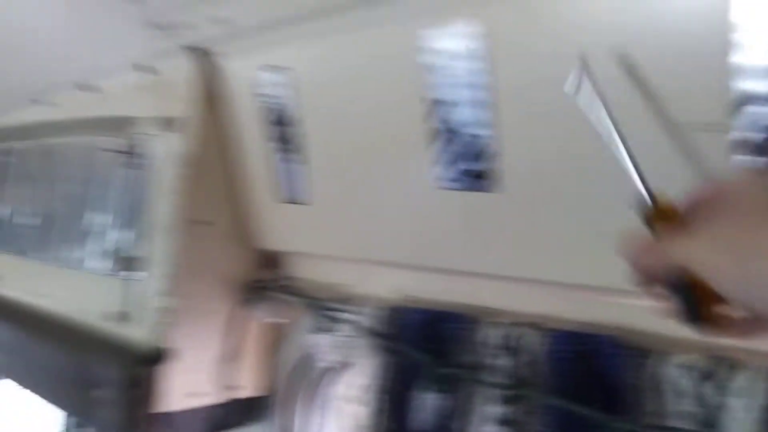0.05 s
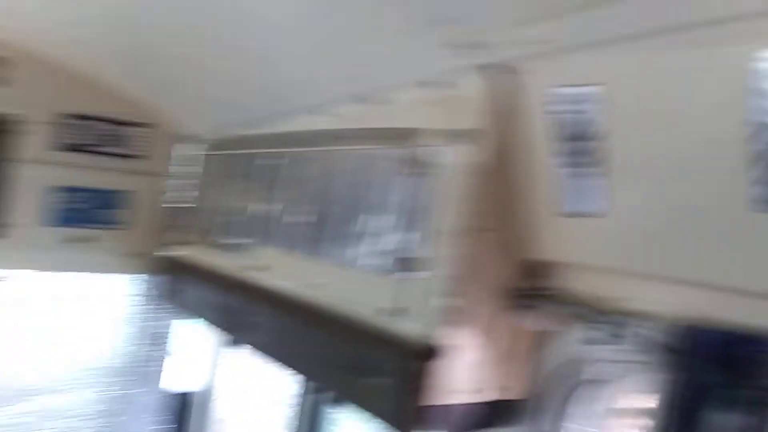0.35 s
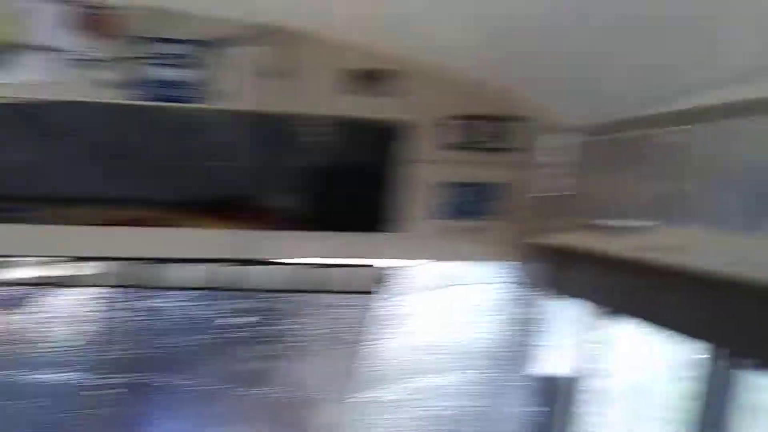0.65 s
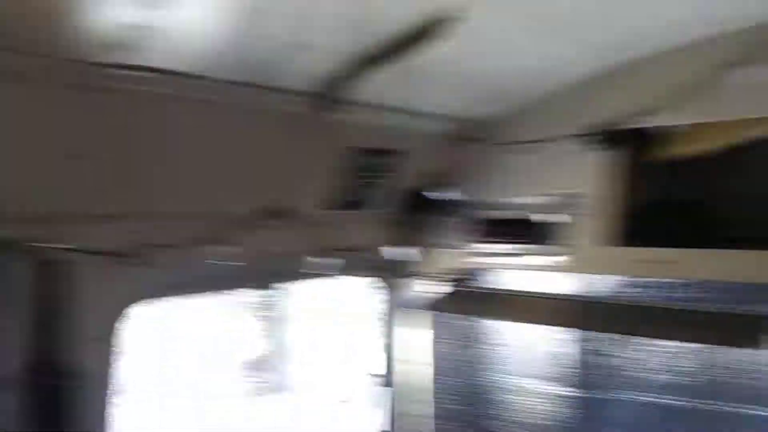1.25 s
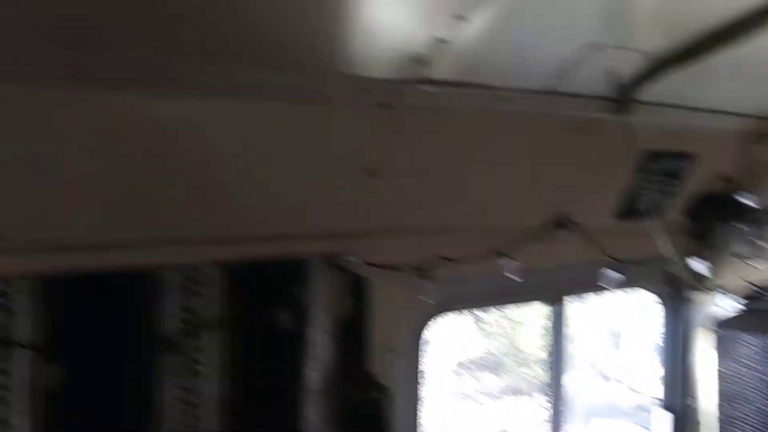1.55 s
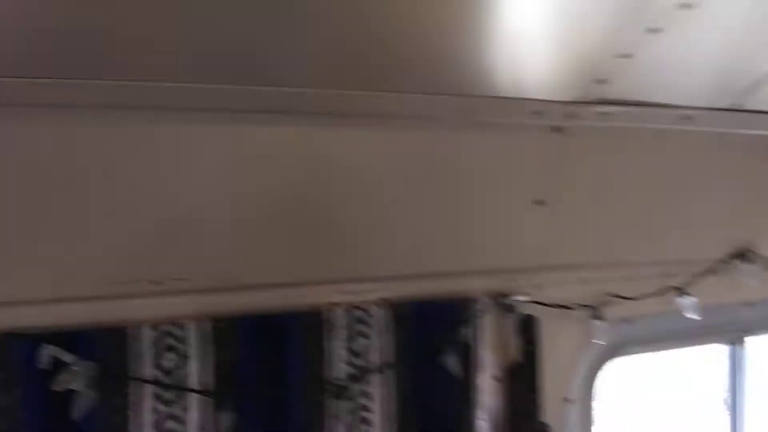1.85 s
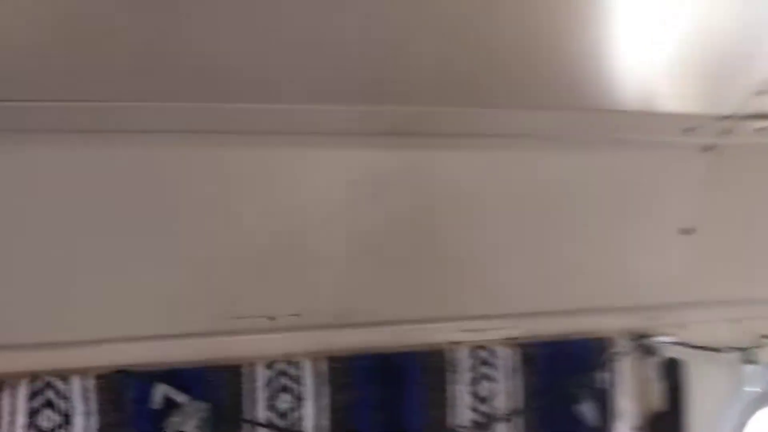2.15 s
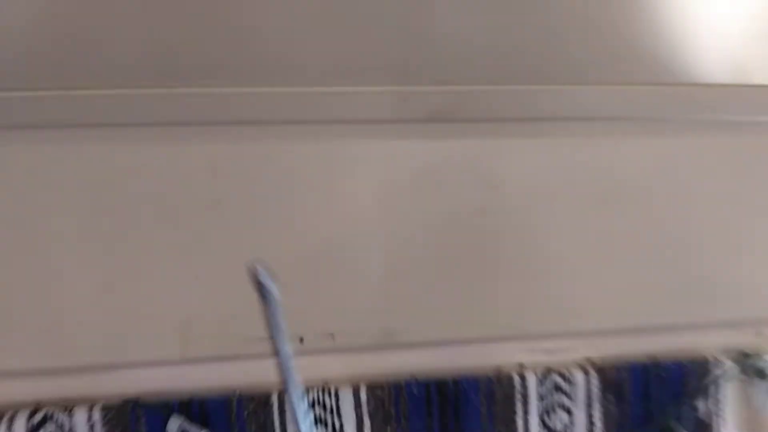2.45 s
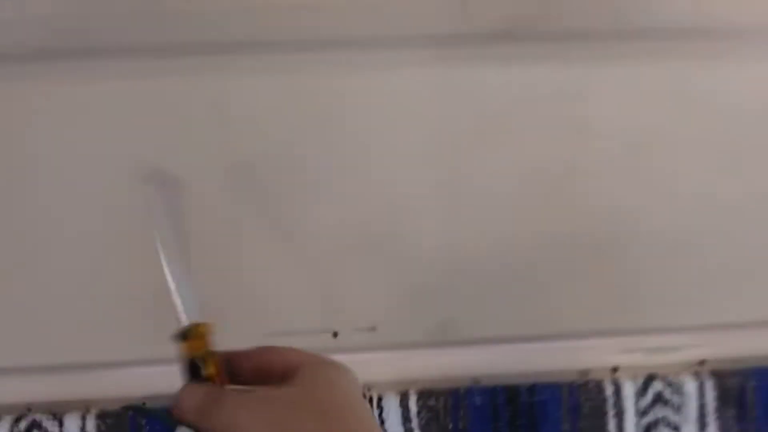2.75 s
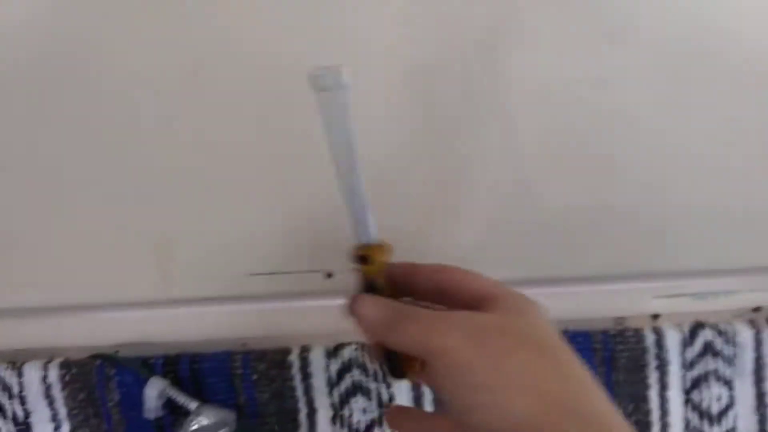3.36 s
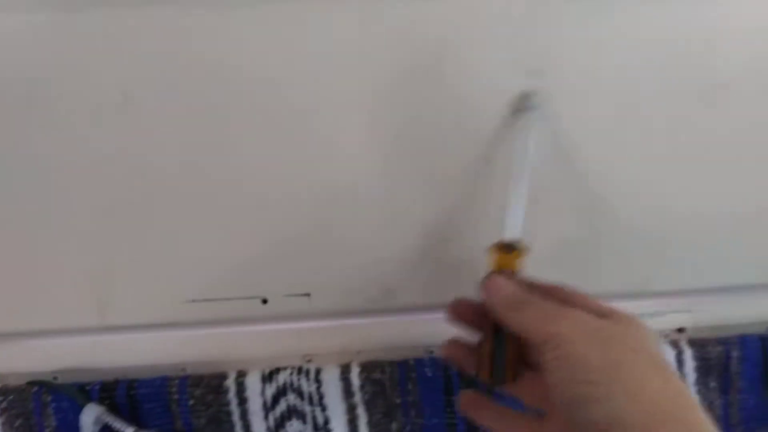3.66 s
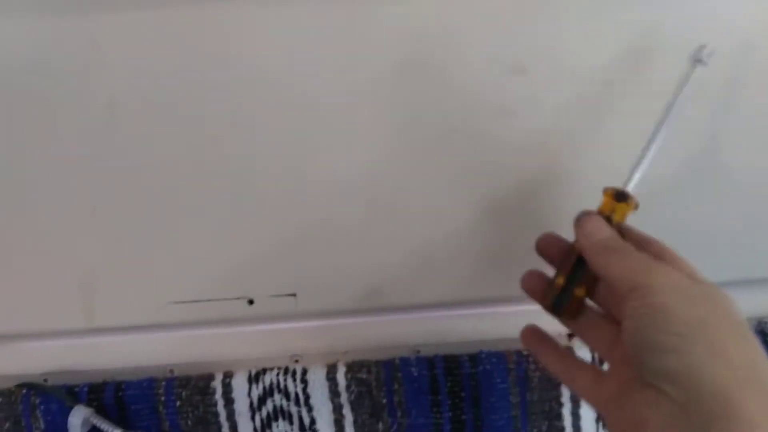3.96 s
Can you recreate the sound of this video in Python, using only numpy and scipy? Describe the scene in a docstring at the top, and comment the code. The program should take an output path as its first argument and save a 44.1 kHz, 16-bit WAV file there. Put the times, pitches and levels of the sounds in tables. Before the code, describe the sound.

Screwdriver taps inside a van: first dull and hollow, later six quick metallic ones.

```python
"""Dull, hollow taps of a screwdriver on a damped wall panel, heard close up inside a small van.
The person turns round with faint rustles and bumps, then taps six times on a ringing metal panel.
Each blow wakes a dense wash of bending modes with a few rings on top, long ones on the metal.
The close microphone rounds off the peaks."""
import sys
import numpy as np
from scipy import signal
from scipy.fft import rfft, irfft
from scipy.io import wavfile

SR = 44100
rng = np.random.default_rng(int(sys.argv[2]) if len(sys.argv) > 2 else 0)


def dump_mix(stems):
    """Bounce the given channels to the path in sys.argv[1] as a 16-bit WAV at rate SR."""
    frames = np.atleast_2d(stems).T  # one column per channel
    limited = np.clip(frames, -1, 1)  # hard clip at full scale
    pcm = np.round(limited * 32767).astype(np.int16)
    wavfile.write(sys.argv[1], SR, pcm)


N = 176400

# Taps on the damped panel. Each row: start in seconds, level of the panel in dB.
DULL_TAPS = [(-.135, -11), (.0582, -11)]
# Clothes and feet. Each row: middle and half length in seconds, scuff and hiss levels in dB.
RUSTLES = [(0, 0.056, -56, -65), (0.25, 0.13, -59.5, -61), (0.801, 0.056, -49, -57), (.87, 0.014, -53, -56),
           (0.946, 0.082, -70, -71), (1.075, 0.024, -57.5, -62), (1.117, 0.043, -54, -65.5),
           (1.277, 0.043, -53, -65.5), (1.353, 0.031, -65, -78), (1.53, 0.092, -64, -64.5),
           (1.645, 0.031, -60, -63), (1.778, .08, -69.5, -67), (1.913, 0.032, -62, -87),
           (2.036, 0.035, -64, -67), (2.166, 0.096, -61, -54.5), (2.276, 0.029, -58, -61),
           (2.41, 0.038, -67.5, -70), (2.538, .1, -67, -58.5), (2.835, 0.047, -67, -61)]
# Soft bumps. Each row: start in seconds, level in dB, tilt in dB per octave, hollow ring in dB.
BUMPS = [(.425, -53, -0.5, -24), (0.499, -57, 1.5, -24), (1.062, -59.5, 1, 3.5), (1.258, -55.5, 4, 2),
         (1.458, -48, 4, -13), (1.498, -39, -3, -2.5), (1.721, -54, 5, -22), (2.293, -54.5, -1, -3.5)]
# Taps on the ringing panel. Each row: start in seconds, level of wash and tick in dB, tilt in dB per
# octave, level of the rings in dB, extra for the high rings in dB, favoured low and high pitch in Hz.
RINGING_TAPS = [(2.8324, -1, 0, 0, -7, 1307, 4673), (3.0503, 0, .3, 0, -1, 1740, 8708),
                (3.2534, 1.3, .3, 0, 0, 1511, 5011), (3.4587, 0, .3, 0, 0, 1846, 3687),
                (3.6381, -2.7, .1, -3, 1, 1606, 8416), (3.8453, -1.8, .3, -2, -1, 1846, 5067)]

# Spectra of the noisy sounds. Each row: frequency in Hz, relative spectral density in dB.
DULL_COLOUR = [(30, -37), (130, -30), (220, -6), (400, -5), (580, 5.5), (950, -7.5), (1350, 1), (1700, 4.5),
               (2300, -10), (3300, -9.5), (5200, -3), (8000, -8.5), (11000, -19.5), (15500, -24)]
TICK_COLOUR = [(100, -25), (1500, -8.5), (5000, 1.5), (15500, 1)]
CABIN_COLOUR = [(18, -38), (30, -6), (81, -24.5), (133, -21), (256, -4), (369, -6), (1640, -3),
                (3490, -11.5), (4540, -9.5), (5740, -9), (15500, -22.5)]
SCUFF_COLOUR = [(60, -37), (160, -25.5), (350, -3.5), (700, 0.5), (1300, 1.5), (2100, -0.5), (3200, -14.5),
                (8000, -37.5)]
HISS_COLOUR = [(1000, -7), (2800, -9), (5000, 2.5), (7000, -1.5), (10000, -10.5), (15500, -12.5)]
BUMP_COLOUR = [(40, -39), (180, -20.5), (350, -10.5), (480, -0.5), (750, -3.5), (1400, -2.5), (2500, -15),
               (6000, -52), (15000, -67)]
RINGING_COLOUR = [(30, -28), (135, -24), (185, -17.5), (250, 1.5), (480, 6), (750, 2), (1100, 1),
                  (1350, 1.5), (1800, 8.5), (2300, -6.5), (2800, -1.5), (3350, -6), (5200, 4), (6700, 0.5),
                  (8000, -1.5), (10000, -8.5), (15500, -23)]

# Damping of each panel's wash. Each row: frequency in Hz, seconds to fall by 60 dB.
DULL_T60 = [(60, 0.62), (250, 0.43), (600, 0.25), (1700, .2), (5000, 0.13), (15000, 0.15)]
RINGING_T60 = [(60, 0.32), (250, 0.51), (600, 0.4), (1700, 0.43), (3000, 0.25), (5500, 0.19), (9000, 0.11),
               (15000, 0.16)]

# Modes heard as single rings. Each row: pitch in Hz, relative level in dB, seconds to fall by 60 dB.
DULL_MODES = [(283, 2, .2), (488, -2, .24), (577, -2, .19), (610, -2, .23), (704, -8, .2), (1676, -1, .17),
              (1752, -2, .15)]
BUMP_MODES = [(356, -2.5, .12), (409, -3, 0.15), (469, 1, 0.16), (1387, -7.5, 0.23)]
RINGING_MODES = [(535, -8, .7), (689, -9, .8), (1307, -4, .65), (1404, -7, .8), (1456, -6, .5),
                 (1511, -6, .55), (1606, -6, .4), (1740, -5, .45), (1846, 0, .6), (2012, -9, .55),
                 (2068, -9, .5), (3687, -14, .5), (3870, -13, .5), (4053, -14, .45), (4673, -11, .48),
                 (4956, -6, .4), (5011, -7, .42), (5067, -7, .42), (6162, -9, .33), (7484, -15, .42),
                 (8416, -12, .33), (8708, -12, .35), (9007, -12, .38)]

BLOW_SAMPLES = 32768
AGE = np.arange(BLOW_SAMPLES) / SR  # seconds since a blow


def undb(db):
    """Decibels to gain."""
    return 10 ** (np.asarray(db) / 20)


def read(table, hz):
    """Value of a (Hz, value) table on a log-frequency axis."""
    freqs, values = np.array(table, float).T
    return np.interp(np.log(np.maximum(hz, 1)), np.log(freqs), values)


def add(out, at_s, sound):
    """Mix a sound in from a given time, which may lie before zero."""
    start = int(at_s * SR)
    sound = sound[max(-start, 0):]
    start = max(start, 0)
    out[start:start + len(sound)] += sound[:N - start]


def fade(t60_s, age=AGE):
    """Exponential decay after a blow."""
    return np.exp(-np.log(1000) * age / t60_s)


def coloured(white, colour, tilt_db=0):
    """Give white noise a spectrum and a tilt per octave; rms near 1."""
    hz = np.fft.rfftfreq(len(white), 1 / SR)
    gain = undb(read(colour, hz) + tilt_db * np.log2(np.maximum(hz, 100) / 1000))
    return irfft(rfft(white) * gain / np.sqrt(np.mean(gain ** 2)), len(white))


def noise(count, colour, tilt_db=0):
    """Fresh noise with the given spectrum."""
    return coloured(rng.standard_normal(count), colour, tilt_db)


def wash(white, colour, t60s, tilt_db=0, hold_s=0):
    """Modes too dense to tell apart: each octave holds while waves spread, then dies at its own rate."""
    spectrum = rfft(coloured(white, colour, tilt_db))
    hz = np.fft.rfftfreq(BLOW_SAMPLES, 1 / SR)
    centres = np.geomspace(60, 15360, 9)
    decaying_s = np.hypot(AGE, hold_s) - hold_s
    out = np.zeros(BLOW_SAMPLES)
    for centre, share in zip(centres, np.eye(len(centres))):
        octave = irfft(spectrum * read(list(zip(centres, share)), hz))
        out += octave * fade(read(t60s, centre), decaying_s)
    return out


def ring(modes, scatter_db=0, detune_hz=1.96):
    """Decaying partials whose strength, phase and fine pitch depend on the spot struck."""
    offsets_db = scatter_db * rng.standard_normal(len(modes))
    shifts_hz = detune_hz * rng.standard_normal(len(modes))
    phases = rng.random(len(modes))
    return sum(undb(db + offset) * np.sin(2 * np.pi * ((hz + shift) * AGE + phase)) * fade(t60)
               for (hz, db, t60), offset, shift, phase in zip(modes, offsets_db, shifts_hz, phases))


def damped_panel(bloom_s=0.007):
    """Short, hollow taps on the damped lining; the first is already dying away as the scene opens."""
    out = np.zeros(N)
    for at_s, db in DULL_TAPS:
        body = wash(rng.standard_normal(BLOW_SAMPLES), DULL_COLOUR, DULL_T60)
        rings = undb(-6) * ring(DULL_MODES) * (1 - np.exp(-AGE / bloom_s))
        add(out, at_s, undb(db) * (body + rings) + tick())
    return out


def tick():
    """The bright crack of the steel tip meeting the panel."""
    return undb(-18) * noise(BLOW_SAMPLES, TICK_COLOUR) * fade(t60_s=0.011)


def cabin_tone():
    """The faint, steady room tone inside the van."""
    return undb(-64) * noise(N, CABIN_COLOUR)


def rustles(grain_db=1.5, grain_hz=162):
    """Grainy swells of rubbing cloth, each a mix of low scuff and high hiss."""
    t = np.arange(N) / SR
    scuff, hiss = np.zeros(N), np.zeros(N)
    for mid_s, half_s, scuff_db, hiss_db in RUSTLES:
        swell = np.exp(-((t - mid_s) / half_s) ** 2)
        scuff += undb(scuff_db) * swell
        hiss += undb(hiss_db) * swell
    grain = undb(grain_db * np.interp(t * grain_hz, np.arange(N), rng.standard_normal(N)))
    return grain * (scuff * noise(N, SCUFF_COLOUR) + hiss * noise(N, HISS_COLOUR))


def bumps(rise_s=0.0015, cabin_t60_s=0.15):
    """Soft knocks, some hollow, that die away in the cabin."""
    out = np.zeros(N)
    for at_s, db, tilt_db, hollow_db in BUMPS:
        knock = noise(BLOW_SAMPLES, BUMP_COLOUR, tilt_db) * fade(cabin_t60_s)
        hollow = undb(hollow_db) * ring(BUMP_MODES)
        add(out, at_s, undb(db) * (knock + hollow) * (1 - np.exp(-AGE / rise_s)))
    return out


def at_spot(modes, high_db, favoured_hz, favour_db=6, within_hz=60, high_above_hz=4900):
    """The spot struck lifts the modes near its favoured pitches and sets the level of the high ones."""
    weighted = []
    for hz, db, t60 in modes:
        favoured = any(abs(hz - pitch) < within_hz for pitch in favoured_hz)
        weighted.append((hz, db + high_db * (hz > high_above_hz) + favour_db * favoured, t60))
    return weighted


def ringing_panel(spot_share=0.3, shimmer_t60_s=0.3, build_s=0.002):
    """Six taps on one metal sheet: a wash, long rings and a shimmer of thin high partials."""
    out = np.zeros(N)
    sheet = rng.standard_normal(BLOW_SAMPLES)
    shimmer_hz = np.linspace(2500, 12400, num=80) + rng.uniform(-200, 200, size=80)
    shimmer_db = read(RINGING_COLOUR, shimmer_hz) - 3 * np.log2(shimmer_hz / shimmer_hz[0])
    shimmer_modes = [(hz, db, shimmer_t60_s) for hz, db in zip(shimmer_hz, shimmer_db)]
    build_up = 1 - .5 * np.exp(-AGE / build_s)
    for at_s, db, tilt_db, rings_db, high_db, *favoured_hz in RINGING_TAPS:
        spot = rng.standard_normal(BLOW_SAMPLES)  # the part of the wash that changes with the spot
        white = np.sqrt(1 - spot_share) * sheet + np.sqrt(spot_share) * spot
        body = undb(db - 10) * wash(white, RINGING_COLOUR, RINGING_T60, tilt_db, hold_s=0.024)
        rings = undb(-22) * ring(at_spot(RINGING_MODES, high_db, favoured_hz), scatter_db=3.5)
        shimmer = undb(-31.5) * ring(at_spot(shimmer_modes, high_db, favoured_hz), scatter_db=5)
        panel = (body + undb(rings_db) * (rings + shimmer)) * build_up
        add(out, at_s, panel + undb(db) * tick())
    return out


def scene():
    """Taps and movement over the quiet of the cabin, in mono."""
    return (cabin_tone() + ringing_panel() + damped_panel() + rustles() + bumps())[None]


def record(dry, clip_level=0.6, low_cut_hz=130, top_hz=16000):
    """The close microphone rounds the loudest peaks and thins the bass; the top is cut."""
    rounded = dry / (1 + (dry / clip_level) ** 4) ** .25
    thin = signal.sosfilt(signal.butter(1, low_cut_hz, "high", fs=SR, output="sos"), rounded)
    return signal.sosfilt(signal.ellip(10, .2, 80, top_hz, fs=SR, output="sos"), thin)


dry = scene()
out = record(dry)
dump_mix(out)
```